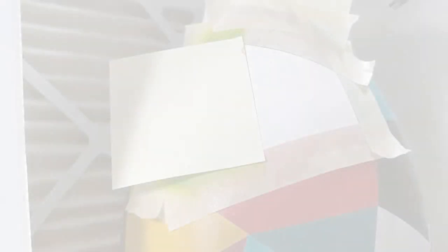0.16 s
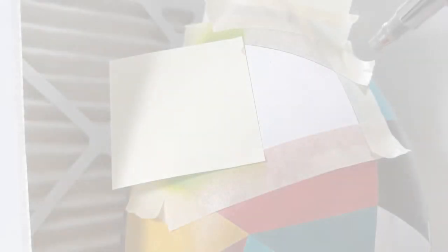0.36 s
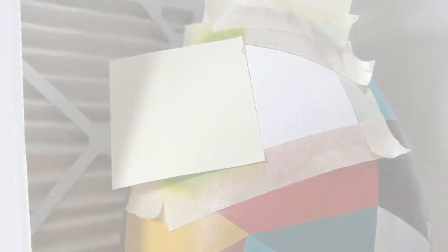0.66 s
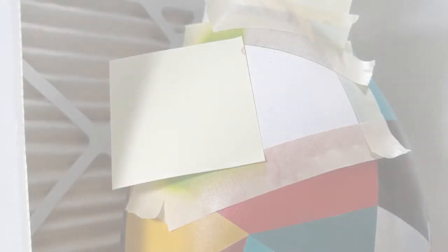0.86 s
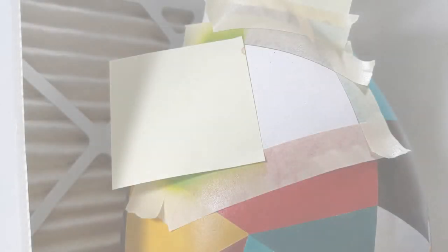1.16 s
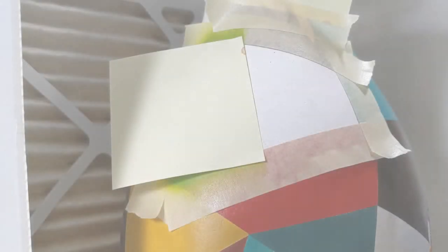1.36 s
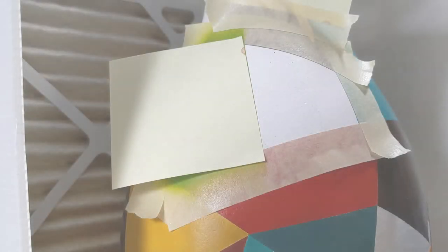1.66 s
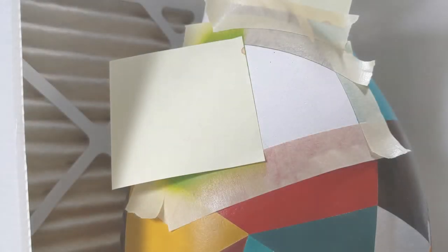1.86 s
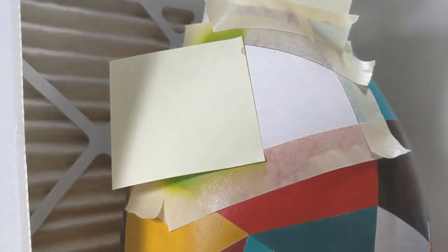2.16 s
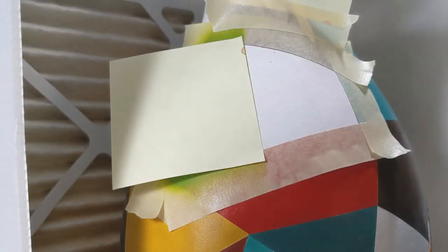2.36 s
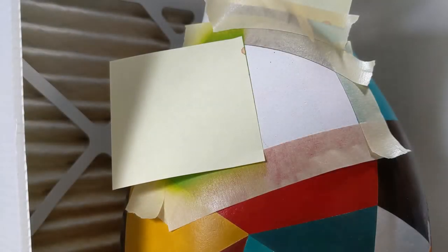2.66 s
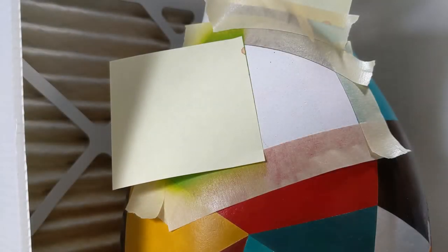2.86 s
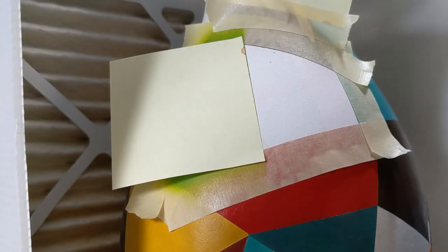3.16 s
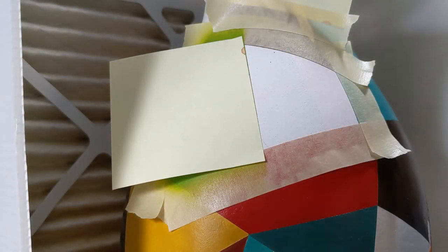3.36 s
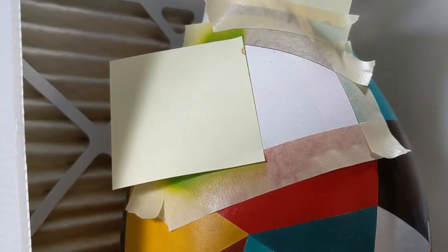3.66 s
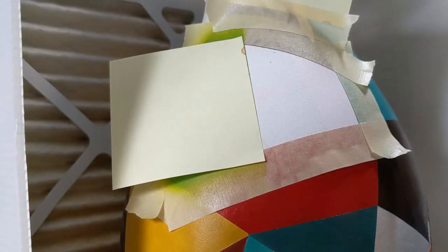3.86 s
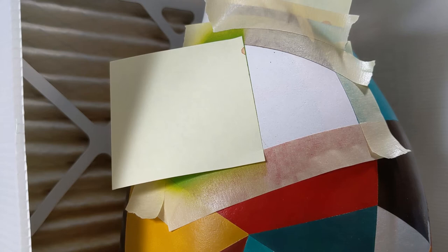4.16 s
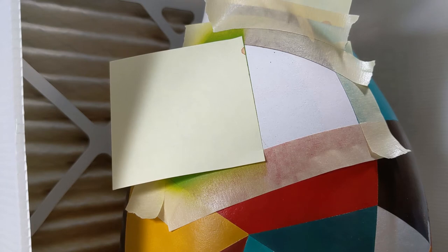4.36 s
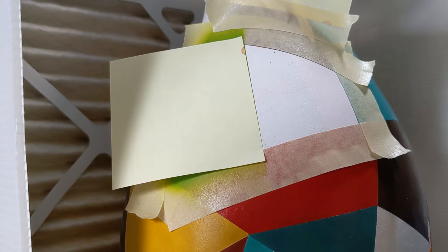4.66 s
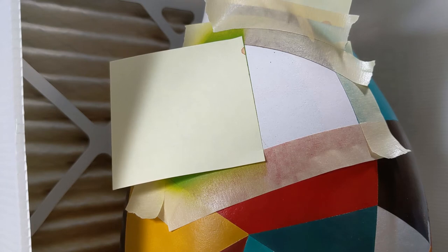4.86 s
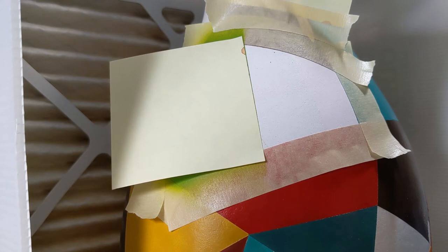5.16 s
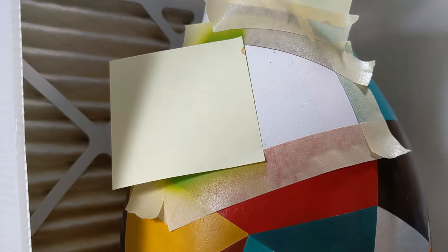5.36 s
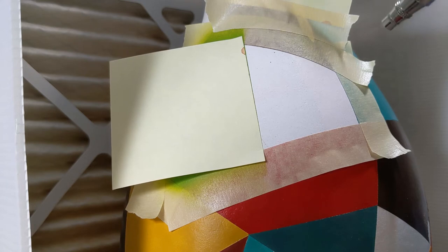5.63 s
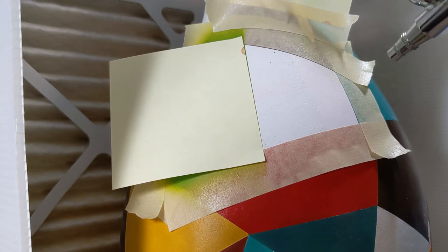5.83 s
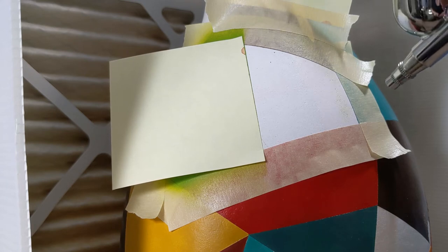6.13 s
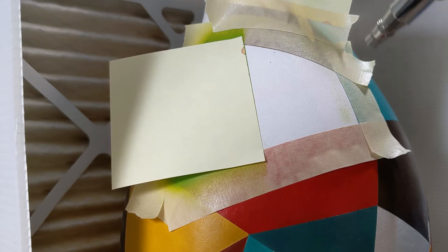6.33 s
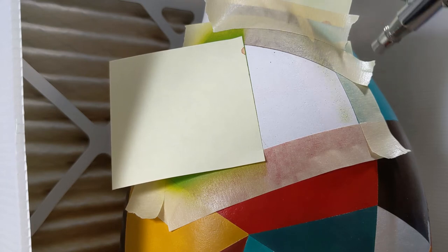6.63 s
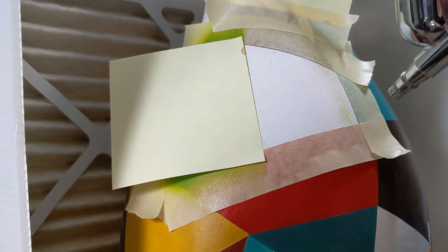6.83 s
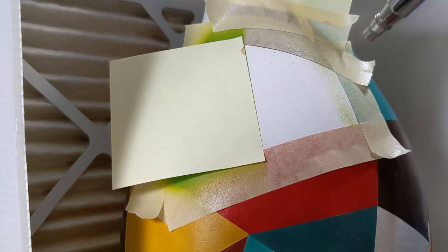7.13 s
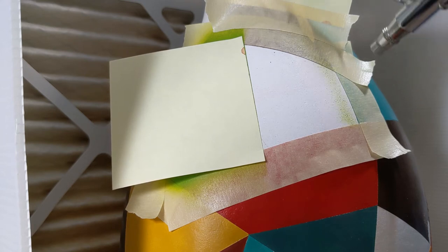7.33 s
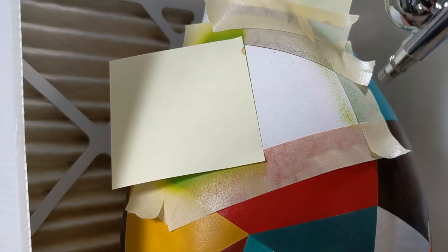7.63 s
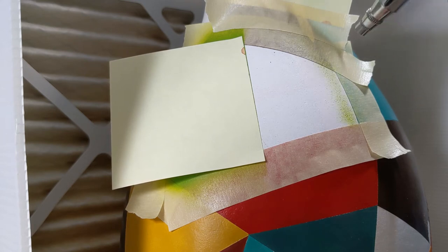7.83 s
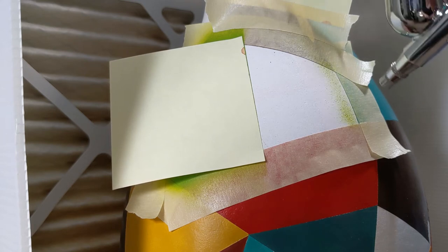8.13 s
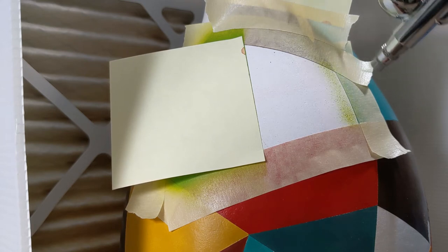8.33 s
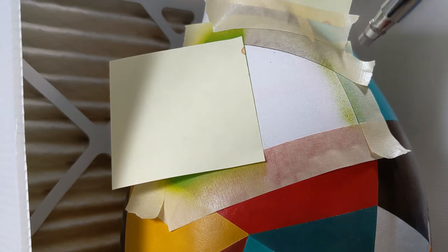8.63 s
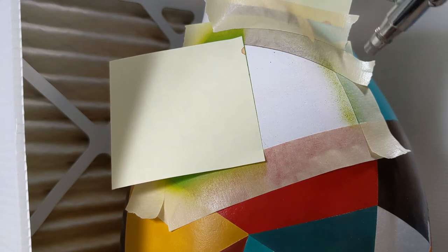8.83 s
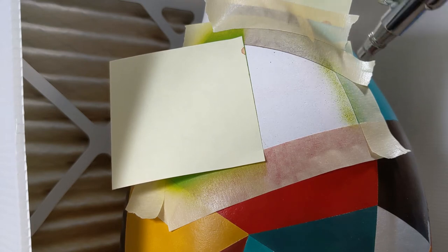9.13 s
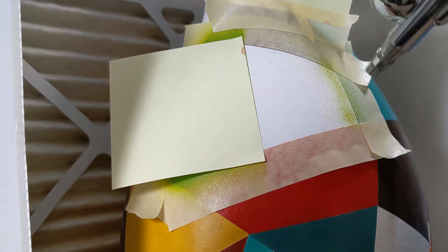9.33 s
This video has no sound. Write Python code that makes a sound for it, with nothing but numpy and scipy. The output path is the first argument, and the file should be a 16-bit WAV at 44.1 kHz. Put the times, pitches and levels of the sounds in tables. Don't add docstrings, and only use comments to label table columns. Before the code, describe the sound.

Close stereo pickup at a small indoor spray booth. From 0 to 1.4 seconds it is quiet: a low fan hum near 75 Hz, soft room air, a faint cloth brush and rustle. A cluster of dull knocks comes at 0.8, a sharp paper flick with a tap at 1.09, then a cloth slide around 1.25. At 1.49 a thin metallic trigger click and a strong puff open a bright, turbulent airbrush hiss, which continues to the end. From about 1.6 a small piston compressor jumps in, quickly reaching a steady, rough buzz of about 78 strokes per second, slowing slightly as load rises, with valve clatter. The hiss leans left, flicking further left at 3.8, then moves to centre and changes colour at 5.2-5.5. Afterwards it wavers gently with back-and-forth sweeps until 9.5, over faint low desk bumps.

```python
import sys
import numpy as np
from scipy import signal
from scipy.io import wavfile
from scipy.ndimage import uniform_filter1d

SR = 44100
rng = np.random.default_rng(int(sys.argv[2]) if len(sys.argv) > 2 else 0)


def voltage_ratio(level):
    return 10 ** (np.asarray(level, float) / 20)


def generate_wav(signal):
    frames = np.transpose(np.atleast_2d(signal))
    scaled = np.clip(frames, -1, 1) * 32767
    pcm = np.round(scaled).astype(np.int16)
    wavfile.write(sys.argv[1], SR, pcm)


N = 418509
HOP = 256
CUTOFF_HZ = 15900
T = np.arange(N) / SR
HZ = np.arange(2 * HOP + 1) * SR / (4 * HOP)
FRAMES = np.arange(N // HOP + 2) * HOP / SR


def rms_one(x):
    return x / np.sqrt(np.mean(x ** 2, axis=-1, keepdims=True) + 1e-20)


def in_time(rows, t=T, outside=None):
    s, *columns = np.transpose(rows)
    return [np.interp(t, s, c, outside, outside) for c in columns]


def at_hz(rows):
    hz, *columns = np.transpose(rows)
    return np.array([np.interp(np.log(HZ + 1), np.log(hz), c) for c in columns])


def bump(hz, width):
    return np.exp(-.5 * ((HZ - hz) / width) ** 2)


def drift(rate, count, step):
    r = np.exp(-2 * np.pi * rate * HOP / SR)
    chance = rng.standard_normal((count, len(FRAMES) + 400))
    slow = signal.lfilter([1], [1, -2 * r, r * r], chance)[:, 400:]
    t = np.arange(0, N + 2 * step, step) / SR
    return np.array([np.interp(t, FRAMES, row) for row in rms_one(slow)])


def patches(rate, count):
    knots = np.linspace(0, SR / 2, count)
    spread = np.maximum(0, 1 - abs(HZ[:, None] - knots) / knots[1])
    return spread @ drift(rate, count, HOP)[:, :len(FRAMES)]


def shaped_noise(db, alike, lag=0):
    shape = (3, len(HZ), len(FRAMES))
    shared, left, right = rng.standard_normal(shape) + 1j * rng.standard_normal(shape)
    late = np.exp(-2j * np.pi * HZ[:, None] * lag / SR)
    share = np.clip(alike, 0, 1)
    pair = np.sqrt(share) * np.array([shared * late, shared])
    pair = pair + np.sqrt(1 - share) * np.array([left, right])
    return signal.istft(pair * voltage_ratio(db), nperseg=4 * HOP, noverlap=3 * HOP)[1][:, :N]


def ring(clicks, hz, t60):
    r, w = voltage_ratio(-60 / (t60 * SR)), 2 * np.pi * hz / SR
    return signal.lfilter([0, np.sin(w)], [1, -2 * r * np.cos(w), r * r], clicks + 1e-18)


# time in seconds, rate in Hz.
FAN_RATE = [(0, 76.36), (1.5, 76.14), (3, 75.89), (4.5, 75.69), (6, 75.59), (7.5, 75.08), (9.49, 74.93)]
# multiple of the blade rate, level in dB.
FAN_HARMONICS = [(1, -67), (1.5, -75), (2, -77)]
# time in seconds, level in dB.
FAN_SWELL = [(0, -4), (1.2, 2), (3, 0), (5.5, -2), (7.5, -3), (8.5, -1), (9.49, -1)]
# frequency in Hz, density in dB per Hz.
ROOM_COLOUR = [(12, -34), (38, -17), (55, 7), (90, -13), (130, -18), (230, -13), (400, -16.5), (900, -12.5),
               (3000, -16.5), (8000, -23.5), (15700, -26)]
# time in seconds, room air level in dB.
ROOM_SWELL = [(0, -70), (.4, -66), (1, -68.5), (9.49, -66)]


def booth_fan():
    turn = 2 * np.pi * np.cumsum(in_time(FAN_RATE)[0]) / SR + 1.07
    hum = sum(voltage_ratio(db + 3) * np.sin(k * turn) for k, db in FAN_HARMONICS)
    hum = hum * voltage_ratio(in_time(FAN_SWELL)[0])
    alike = 1 / (1 + HZ[:, None] / 600)
    room = rms_one(shaped_noise(at_hz(ROOM_COLOUR)[0][:, None], alike))
    return hum * voltage_ratio(np.array([[-1.1], [1.1]])) + voltage_ratio(in_time(ROOM_SWELL)[0]) * room


# peak time in seconds, level in dB, half length in seconds.
PRESSES = [(0.858, -73, 0.044), (1.277, -60, 0.093), (1.656, -65, 0.15), (2.1, -70, 0.17),
           (2.55, -69, 0.17), (3.048, -70, .1), (.45, -83, 0.11), (4.35, -75, 0.097), (3.8, -70, .08),
           (4.75, -77, 0.14), (5.32, -69, .05), (5.612, -64, 0.1), (5.93, -70, .05), (6.6, -70, 0.064),
           (6.76, -63, .1), (7.178, -65, .04), (7.45, -64, 0.076), (7.8, -72, .06), (8.07, -66, .1),
           (8.46, -75, .06), (8.787, -61, 0.07), (9.23, -57.5, .07), (9.47, -74, .05)]
# frequency in Hz, width in Hz, level in dB.
DESK_RESONANCES = [(138, 29, -0.5), (203, 31, 0.5), (305, 190, -7)]


def desk_rumble():
    modes = sum(voltage_ratio(db) / (1 + ((HZ - hz) / width) ** 4) + 1e-5 for hz, width, db in DESK_RESONANCES)
    rumble = rms_one(shaped_noise(20 * np.log10(modes)[:, None], alike=0.62))
    pressing = voltage_ratio(-71.5)
    pressing = pressing + sum(voltage_ratio(db) * np.exp(-((T - s) / half) ** 2) for s, db, half in PRESSES)
    return voltage_ratio(5.5) * pressing * rumble


# peak in seconds, level in dB, rise and fall in dB per second,
# fine cloth hiss in dB.
SLEEVE = [
    (.15, -94, 90, 90, -63.5),
    (.49, -75.5, 300, 198, -76),
    (.81, -81, 895, 89, -86),
    (1.088, -66, 4988, 400, -80),
    (1.09, -94, 890, 33, -88),
    (1.256, -69.5, 110, 69, -57.5),
]
# frequency in Hz, density in dB per Hz.
SLEEVE_COLOUR = [(180, -37), (300, -10), (675, -4), (824, -8), (895, -12), (972, -11), (1450, -6.5),
                 (2050, -11), (2810, -15), (4500, -25.5), (15700, -35)]


def rustle():
    paper = rms_one(shaped_noise(at_hz(SLEEVE_COLOUR)[0][:, None], alike=0.21))
    high_pass = signal.butter(2, 5000, "high", fs=SR, output="sos")
    cloth = signal.sosfilt(high_pass, rng.standard_normal((2, N)))
    out = np.zeros((2, N))
    for s, db, rise, fall, cloth_db in SLEEVE:
        swell = voltage_ratio(-np.maximum(rise * (s - T), fall * (T - s))) * (T < 1.47)
        out += swell * (voltage_ratio(db + 14.5) * paper + voltage_ratio(cloth_db) * cloth)
    return out


# start in seconds, peak in dB, ring in Hz, t60 in seconds.
CONTACTS = [(.805, -45, 400, 0.06), (.809, -47, 680, .02), (.81, -51, 1100, .02), (.804, -57, 1900, .03),
            (.804, -59, 3000, .02), (.83, -52, 450, .04), (.846, -51, 620, .03), (.85, -66, 6200, .03),
            (.858, -48, 340, .04), (.866, -51, 600, .02), (.881, -44, 135, 0.3),
            (1.0845, -41.5, 1460, 0.035), (1.085, -50, 2120, .012), (1.085, -49, 2800, .01),
            (1.085, -49, 560, .02), (1.085, -51, 1000, .015), (1.093, -48, 300, .08)]


def taps():
    out = np.zeros((2, N))
    bursts = rng.standard_normal((len(CONTACTS), 2, 1800)) * np.exp(-np.arange(1800) / 420)
    for (s, db, hz, t60), burst in zip(CONTACTS, bursts):
        body = ring(np.pad(burst, ((0, 0), (0, 7800))), hz, t60)
        at = round(s * SR)
        out[:, at:at + 9600] += voltage_ratio(db) * body / abs(body).max()
    return out


# frequency in Hz, dB left and right with the brush held away,
# dB left and right with it aimed at the card.
JET_TREBLE = [(3000.0, -21.7, -21.0, -20.2, -18.8), (3600.0, -17.0, -17.4, -16.2, -16.5),
              (4500.0, -18.2, -16.0, -16.4, -14.1), (5500.0, -14.3, -15.7, -15.6, -15.2),
              (6800.0, -14.0, -11.7, -16.3, -14.3), (8000.0, -13.9, -13.8, -17.0, -15.8),
              (9300.0, -10.1, -11.0, -13.6, -11.1), (10500.0, -4.4, -7.8, -10.3, -6.1),
              (12000.0, -4.6, -4.9, -7.3, -3.3), (13000.0, -5.7, -9.9, -3.4, -10.0),
              (14200.0, -5.0, -8.0, -5.7, -8.4), (15200.0, 2.8, -2.4, -3.1, -1.2),
              (15700.0, 2.1, -3.3, 0.4, 1.4)]
# centre in Hz, width in Hz, then the same four dB columns.
BOOTH_RIPPLE = [(3935.0, 162.0, -1.7, -0.4, -8, -2.5), (5760.0, 128.0, -2.6, -2.8, -6, -4),
                (6150.0, 150.0, 0, 0, 3, 2), (7330.0, 170.0, 0, 0, -4.5, -4.5),
                (6505.0, 107.0, -3.1, -5.0, -2.5, -3.5), (8537.0, 137.0, -1.5, 1.5, -4, 0),
                (9966.0, 155.0, -5.8, -1.3, -2.2, -1.7), (11229.0, 137.0, 4.3, -0.6, 3.3, 0.8),
                (11891.0, 106.0, 7.1, 3.6, 4.8, 1.0), (12738.0, 183.0, 2.0, 3.0, 2.4, 1.2),
                (13700.0, 189.0, 8.9, 3.0, 6.2, 1.9), (13975.0, 104.0, -1.0, -0.9, -2.2, -3.1),
                (14630.0, 162.0, 9.6, 4.8, 7.4, 4.0), (14922.0, 184.0, -2.2, -5.0, -1.9, -4.0),
                (15331.0, 97.0, -1.0, 5.1, -2.9, 1.7)]
# centre in Hz, width in Hz, dB per reach, dB per lean.
HAND_LOBES = [(14500, 230, 0, 1.5), (13900, 220, -1, 0), (15300, 300, 9, 1), (11700, 950, -1, -2.5)]
# from and to, in seconds.
PUFF_FADE_S = (1.6, 1.66)
# centre in Hz, width in Hz, level in dB.
PUFF_COLOUR = [(1700, 700, -4), (5200, 500, -2), (7500, 600, 4), (10900, 600, -3)]


def jet_colour(pose, reach, lean):
    bass = [(60, -70, -75, -71, -71), (398, -20.5, -21.5, -29, -33), (1900, -25.5, -23.5, -24.5, -23)]
    broad = at_hz(bass + JET_TREBLE)
    colour = broad.copy()
    for hz, width, *db in BOOTH_RIPPLE:
        colour = colour + np.outer(np.array(db) * [1.15, 1.15, .8, 1.0], bump(hz, width))
    colour -= 10 * np.log10(np.mean(voltage_ratio(colour[:, HZ < CUTOFF_HZ]) ** 2, axis=1, keepdims=True))
    db = colour[:2, :, None] * (1 - pose) + colour[2:, :, None] * pose
    for hz, width, reach_db, lean_db in HAND_LOBES:
        db[0] += np.outer(bump(hz, width), reach_db * reach + lean_db * lean)

    echo_s = .000609 - .000025 * reach
    comb = np.cos(2 * np.pi * np.outer(HZ, echo_s))
    db[0] += 3.8 * pose * comb * bump(13000, 1500)[:, None]

    slid = np.interp(HZ[:, None] / (1 + .06 * lean), HZ, broad[3]) - broad[3][:, None]
    db[1] += slid * ((HZ > 5000) & (HZ < 13600))[:, None]
    fresh = np.interp(FRAMES, PUFF_FADE_S, [1, 0])
    db += sum(np.outer(bump(hz, width), puff_db * fresh) for hz, width, puff_db in PUFF_COLOUR)

    for side in range(2):
        db[side] += patches(2.0, count=40) * (1.1 + .2 * pose)
        db[side] += patches(.4, count=200) * (2.6 - .9 * pose)
    db += patches(1.2, count=260) * 2.0 * (HZ[:, None] < 9000)
    return db


# time in seconds, level in dB.
SPRAY_LEVEL = [(1.48, -19), (1.495, -25.5), (1.6, -28.5), (1.97, -28), (2.53, -28), (2.72, -27),
               (3.26, -25.5), (3.44, -25.5), (3.91, -27), (4.0, -25), (4.11, -27), (4.45, -26.5),
               (4.85, -26), (5.15, -25.5), (5.25, -28), (5.6, -28.5), (5.85, -29), (6.1, -28), (7.37, -28),
               (7.48, -27), (9.49, -28)]
# time in seconds, share aimed 0 to 1.
BRUSH_POSE = [
    (5.12, 0.14),
    (5.24, 0.15),
    (5.5, 0.97),
]
# time in seconds, reach down the card -1 to 1,
# lean toward the card -1 to 1.
HAND_SWEEP = [(5.3, .6, 0), (5.8, -.6, -.9), (6.05, .9, -.6), (6.3, 1, -.5), (6.55, -1, -.3), (6.8, .9, .1),
              (7.05, 1, .2), (7.25, -.8, 0), (7.58, 1, .6), (7.9, -.3, .6), (8.25, .9, .7), (8.52, -.8, .9),
              (8.9, .3, .7), (9.2, -.3, -.3), (9.49, .4, -.7)]
# time in seconds, left over right in dB.
AWAY_PAN = [(1.5, 4.4), (3.2, 4.2), (3.7, 4.6), (4.1, 5.6), (4.9, 5.4), (5.15, 2.5)]


def airbrush():
    pose, = in_time(BRUSH_POSE, FRAMES)
    reach, lean = pose * uniform_filter1d(in_time(HAND_SWEEP, FRAMES), size=15)
    db = jet_colour(pose, reach, lean)
    lag = 7.75 + pose * 1.8 + .25 * reach
    alike = .55 - .1 * pose + .14 * (HZ[:, None] > 12000) + .08 * pose * (HZ[:, None] < 6000)
    jet = rms_one(shaped_noise(db, alike, lag))
    level, = in_time(SPRAY_LEVEL)
    pan = in_time(AWAY_PAN, FRAMES)[0] * (1 - pose) - .1 * pose + .6 * reach
    pan = np.interp(T, FRAMES, pan)
    pan += 7.5 * np.exp(-((T - 3.78) / .024) ** 2)
    gust = rms_one(signal.lfilter([1], [1, -.99], rng.standard_normal(N)))
    opening = np.clip((T - 1.477) / .012, 0, 1) ** 2
    return jet * opening * voltage_ratio(level + 2.9 + gust + pan * np.array([[.5], [-.5]]))


# time in seconds, peak in dB.
TRIGGER_HITS = [
    (1.4897, -4),
    (1.4915, -14),
]
# frequency in Hz, level in dB, t60 in seconds.
BUTTON_MODES = [(1900, -22, .006), (3200, -13, .014), (4340, -8, .009), (5950, -15, .006), (7450, 1, .0045),
                (10500, -3, .0035), (12200, -8, .003)]


def trigger():
    clicks = np.zeros(N)
    for s, db in TRIGGER_HITS:
        clicks[round(s * SR)] = voltage_ratio(db - 4.5)
    click = np.zeros(N)
    for k, (hz, db, t60) in enumerate(BUTTON_MODES):
        click += voltage_ratio(db) * ring(clicks, hz, t60) * (-1) ** k
    click = signal.sosfilt(signal.butter(2, 1500, "high", fs=SR, output="sos"), click)
    return np.array([np.roll(click, 11) * voltage_ratio(-6.0), click])


# time in seconds, strokes per second.
STROKE_RATE = [(1.66, 72), (1.7, 75.5), (1.74, 77.8), (1.79, 78.5), (1.85, 78.49), (2.3, 78.02), (3, 77.68),
               (4, 77.52), (5, 77.21), (6, 77.08), (7, 76.93), (8, 76.79), (9.49, 76.64)]
# time in seconds, level in dB.
SPIN_UP = [(1.6, -60), (1.64, -24), (1.7, -15), (1.708, -3), (1.73, -3), (1.77, -5), (1.9, -3), (2.3, -1.5),
           (3.2, 0)]
# time in seconds, share of full load.
BACK_PRESSURE = [(1.7, .5), (1.73, .3), (1.78, -.4), (2.2, -.25), (3.2, .1), (3.7, .4), (4.7, .65),
                 (5.5, .8), (8, 1), (9.49, 1.05)]
# left and right in dB at light load, left and right in dB loaded.
STROKE_LEVELS = [(-64, -61, -66, -64), (-69, -66.5, -69.5, -63), (-56.5, -59, -58, -59.5),
                 (-67.5, -63.5, -65.5, -64), (-70.5, -61, -74, -62.5), (-59, -57.5, -62.5, -59.5),
                 (-58.5, -52.5, -54, -51), (-58.5, -52.5, -60.5, -54), (-48.8, -43, -43.1, -39.5),
                 (-64.5, -60.5, -60, -56.5), (-67.5, -47.5, -58, -49.5), (-76.5, -69.5, -77.5, -75.5),
                 (-53.5, -50, -66, -51.5), (-68, -57.5, -60.5, -60.5), (-51, -55, -49.5, -55.5),
                 (-71, -73, -57, -63), (-63, -55, -57.5, -58), (-70, -59, -60, -51.5),
                 (-73, -66, -69, -65), (-60.5, -67, -69, -69.5), (-66.5, -64.5, -70, -70.5),
               (-77, -72.5, -70, -76.5), (-59.5, -58.5, -69.5, -67), (-64.5, -63, -68, -60),
               (-60, -68, -56.5, -63), (-62, -63, -69, -69.5), (-65.5, -65, -57, -55.5),
               (-66.5, -64.5, -62, -73.5), (-64, -64.5, -60.5, -60.5), (-60, -58, -64.5, -57.5),
               (-68.5, -70, -63, -59), (-76, -71.5, -72, -63), (-67.5, -73, -69, -61.5),
               (-57.5, -56, -62, -66), (-64.5, -60, -58, -61.5), (-77, -75.5, -67.5, -68.5)]
MIDDLE_LEVELS = [(-65, -62.5), (-69, -65), (-58, -60), (-65, -64), (-73, -62), (-59, -57), (-56, -51),
                 (-61, -53), (-44.5, -41.5), (-62, -56), (-65, -48), (-81, -72), (-56, -53), (-66, -59),
                 (-50, -55), (-62, -67), (-60, -55), (-69, -53), (-71, -64), (-67, -65), (-67, -65),
                 (-86, -86), (-63, -65), (-69, -60), (-64, -64), (-57, -60), (-60, -62), (-61, -62),
                 (-58, -57), (-62, -55), (-62, -63), (-69, -66), (-66, -65), (-55, -54), (-69, -61),
                 (-73, -73)]
LOW_PHASE = [.3, -.4, 0, -.1, -.8, -.4, -1.05, -.4, -2, -.6, -2.5, -1.8, -1.7, -2.3, -1.8, -1.1, -1.9,
             -2.3]
LOW_PHASE_LOADED = [.3, -.5, 0, 0, -1.1, -.6, -.5, -.8, -1, -.1, -2.6, -3.9, -1.7, -3.2, -1.4, -2.7,
                    -1.7, -3.1]
HIGH_PHASE = [(19, .9), (25, .4), (27, -1), (30, -.5), (31, .6), (33, .2), (34, -1.7), (36, -1.1)]
# frequency in Hz, density in dB per Hz.
CLATTER_COLOUR = [(150, -51), (260, -1), (420, -9), (700, 1.5), (920, -25), (1150, -5.5), (1600, -11),
                  (2000, -4), (2400, -2), (2700, 0.5), (2950, -40), (4000, -52)]
# time in seconds, clatter level in dB.
CLATTER_SWELL = [(1.6, -75), (1.625, -52.5), (1.7, -52), (2.2, -55.5), (3.5, -57.5), (5, -53.5), (7, -62),
                 (9.49, -57)]


def compressor():
    turn = 2 * np.pi * np.cumsum(in_time(STROKE_RATE)[0]) / SR
    load, = in_time(BACK_PRESSURE)
    below_light = np.minimum(load, 0)
    levels = STROKE_LEVELS
    wobble = drift(2.5, count=len(levels), step=1)[:, :N]
    buzz = np.zeros((2, N))
    for k, (row, middle, wob) in enumerate(zip(levels, MIDDLE_LEVELS, wobble), start=1):
        if k <= len(LOW_PHASE):
            light_lead = LOW_PHASE[k - 1]
            lead = light_lead + load * (LOW_PHASE_LOADED[k - 1] - light_lead)
        else:
            lead = in_time(HIGH_PHASE, k)[0] + 0 * load
        phase = k * turn + rng.uniform(0, np.pi) * (k - 1) + .005 * k * wob
        db = np.array([np.interp(load, [0, .6, 1], [light, mid, loaded]) + below_light * (loaded - light)
                       for light, mid, loaded in zip(row[:2], middle, row[2:])])
        gain = voltage_ratio(db + 3.3 + 1.0 * (k > 12) + .7 * wob)
        buzz += gain * np.sin(phase + lead * np.array([[1], [0]]))
    start, = in_time([(0, -140), (1.59, -140)] + SPIN_UP)
    noise = rms_one(shaped_noise(at_hz(CLATTER_COLOUR)[0][:, None], alike=0.95))
    valve = 1 + .5 * np.cos(turn) + 0.16 * np.cos(2 * turn)
    return voltage_ratio(start) * buzz + voltage_ratio(in_time(CLATTER_SWELL, outside=-120)[0]) * valve * noise


def scene():
    handling = desk_rumble() + rustle() + taps()
    return booth_fan() + handling + airbrush() + trigger() + compressor()


# frequency in Hz, dB under the neighbourhood with the brush away, the
MUTE_MARGIN = [(2500, 16, 16), (2800, 2.4, 4), (3050, 0, 2.6), (3450, -.2, 4), (3900, 1.8, 2.4),
               (4300, 3.2, 3.6), (5200, 3.2, 3), (5800, 3.2, 1.8), (6500, 3, 2.4), (7300, 3.8, 1.8),
               (8000, 3.2, 3), (8600, 1.8, 3), (9300, 3.8, 4), (10500, 6.5, 6), (12000, 16, 16)]


def mute_weak_cells(x):
    s, z = signal.stft(x, SR, nperseg=4 * HOP, noverlap=3 * HOP)[1:]
    power = np.sum(abs(z) ** 2, axis=0) + 1e-20

    def smooth(grid, bins, frames):
        return uniform_filter1d(uniform_filter1d(grid, size=bins, axis=0), size=frames, axis=1)

    rows = np.arange(len(HZ)) // 3 * 3 + 1
    columns = np.minimum(np.arange(len(s)) // 6 * 6 + 3, len(s) - 1)
    cell = smooth(power, 3, 6)[rows][:, columns]
    around = smooth(np.log(cell), 11, 121)
    whim = rms_one(smooth(rng.standard_normal(power.shape), 3, 9))
    away, aimed = at_hz(MUTE_MARGIN)[:, :, None]
    pose, = in_time(BRUSH_POSE, s)
    margin_db = away * (1 - pose) + aimed * pose
    margin_db = margin_db + 2.4 * whim[rows][:, columns]
    weak = (cell < np.exp(around) * voltage_ratio(-2 * margin_db)) & (s > 1.53)
    return signal.istft(z * np.where(weak, voltage_ratio(-30), 1), nperseg=4 * HOP, noverlap=3 * HOP)[1][:, :N]


def top_cut(x):
    return signal.sosfilt(signal.butter(12, 17000, fs=SR, output="sos"), x)


def record(dry):
    low_pass = signal.ellip(12, .3, 76, CUTOFF_HZ - 150, fs=SR, output="sos")
    mix = mute_weak_cells(signal.sosfilt(low_pass, dry))
    return top_cut(mix)


dry = scene()
out = record(dry)
generate_wav(out)
```